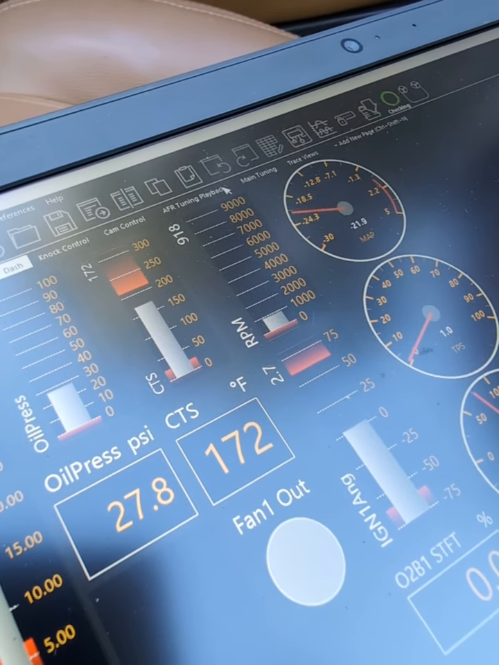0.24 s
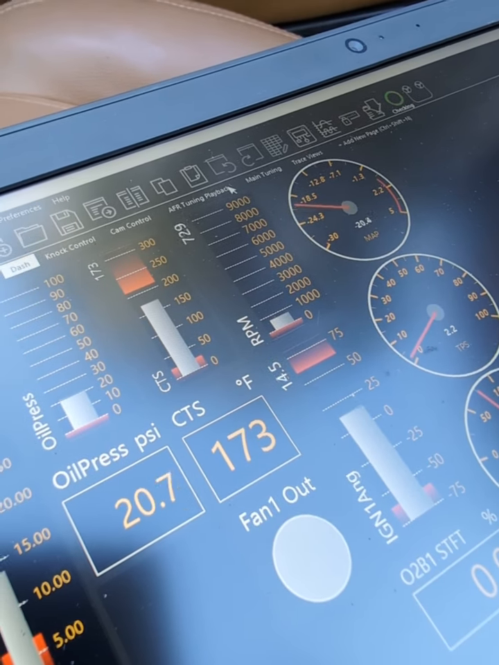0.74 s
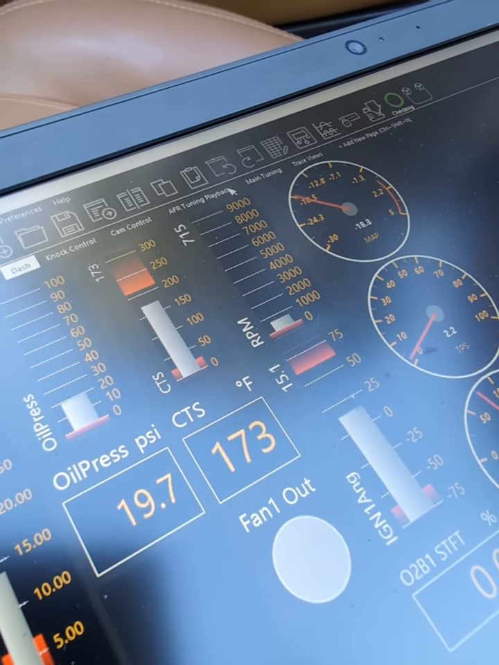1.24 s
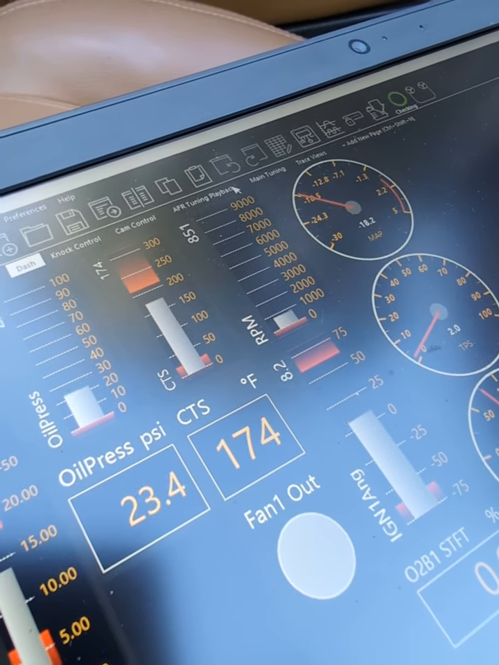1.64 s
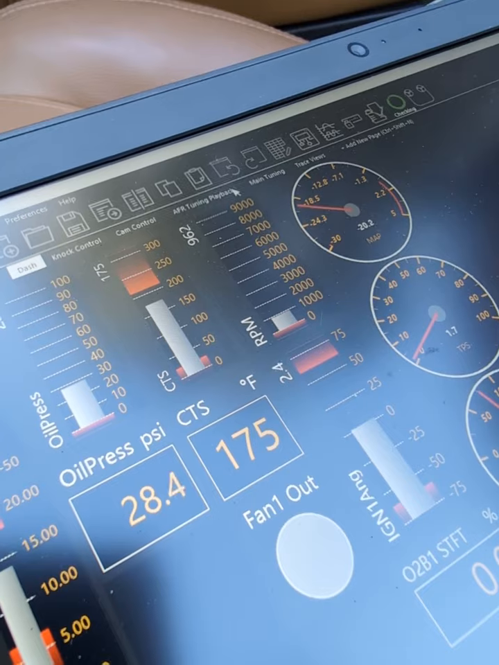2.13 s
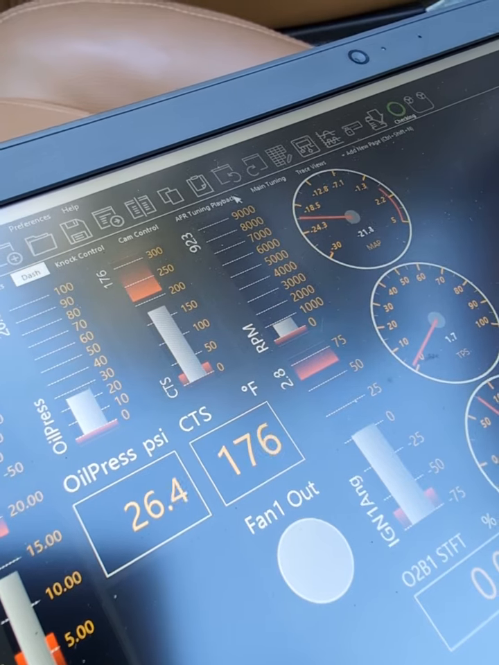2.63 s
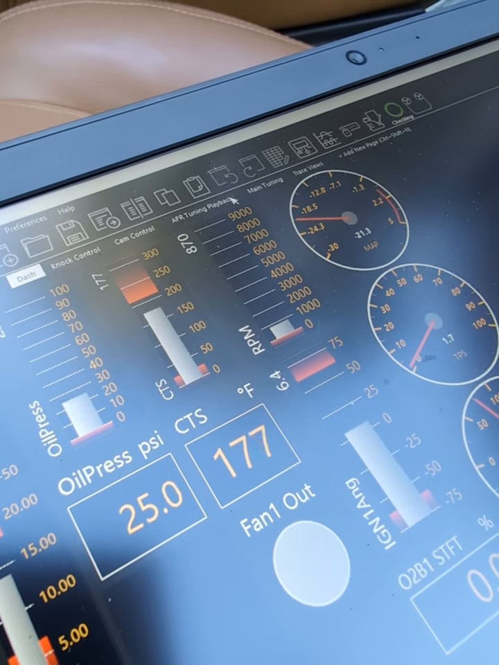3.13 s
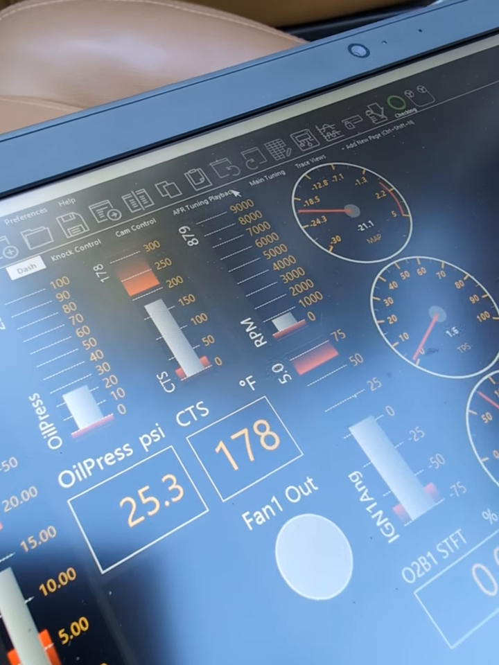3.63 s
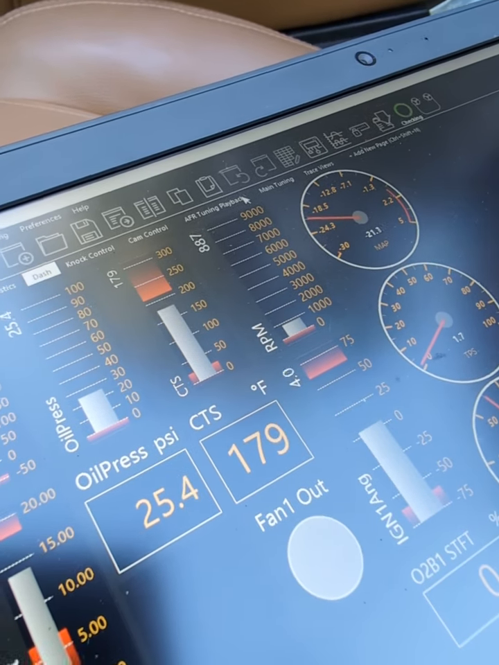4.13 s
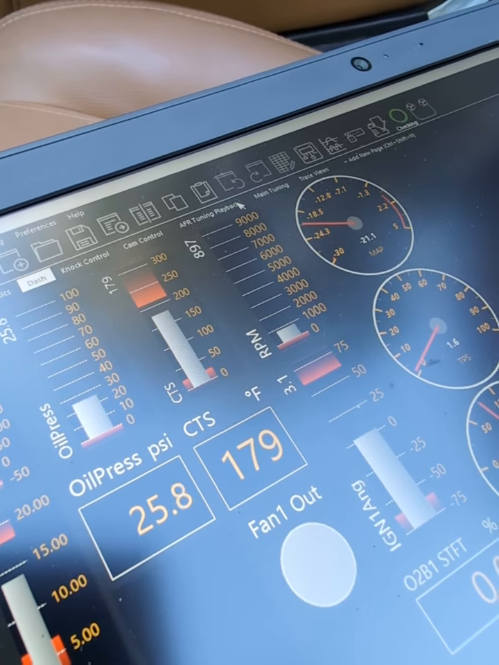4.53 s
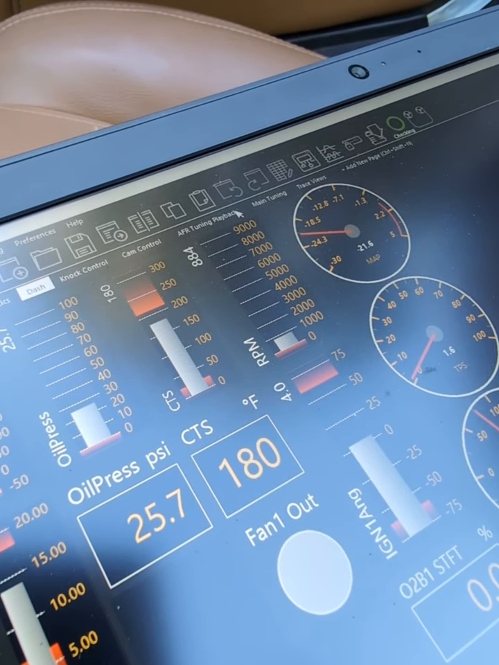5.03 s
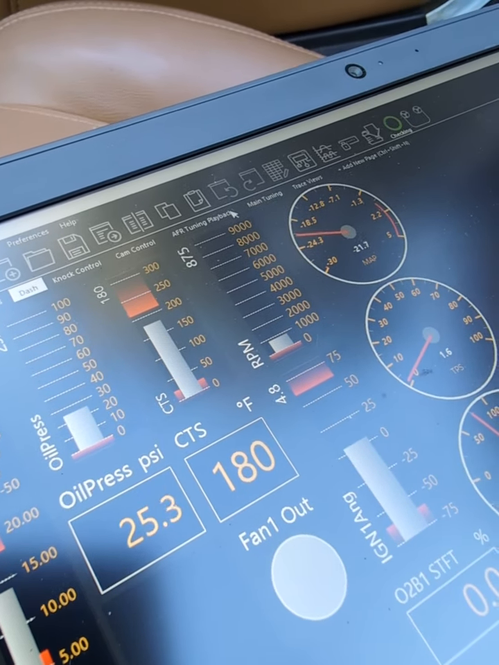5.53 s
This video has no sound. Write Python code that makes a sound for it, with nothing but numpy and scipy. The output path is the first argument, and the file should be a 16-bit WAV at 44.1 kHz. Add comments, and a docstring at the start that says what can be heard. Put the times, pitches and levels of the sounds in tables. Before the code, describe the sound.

Heard from inside a car, an idling engine slows and stumbles, its deep hum thinning to a rough throb. Within about two seconds it recovers with a swell, then eases down to an even, low drone that lasts to the end. Light mechanical ticking and a faint airy hiss pulse along with it, while very quiet high whines and tiny interior squeaks sit far behind.

```python
"""Inside a car, a four-cylinder engine idles: its speed sags, overshoots and settles.
The exhaust orders, harmonics of the two-turn engine cycle, excite a boom in the cabin, loudest at twice
the firing rate. The block rumbles through the bulkhead, valve gear clatters and intake air hisses once
per firing. Behind them lie thin whines, a narrow band fluttering near 6 kHz and faint trim squeaks."""
import sys
import numpy as np
from scipy import signal
from scipy.fft import rfft, irfft, next_fast_len
from scipy.io import wavfile
from scipy.ndimage import uniform_filter1d, map_coordinates

SR = 44100
rng = np.random.default_rng(int(sys.argv[2]) if len(sys.argv) > 2 else 0)


def materialize(psi):
    """Save the field psi as 16-bit PCM at rate SR to the path in sys.argv[1].

    A 1-D psi becomes a single channel; in a 2-D psi each row is a channel.
    """
    bounded = np.clip(np.atleast_2d(psi).T, -1, 1)
    quanta = np.round(bounded * 32767).astype(np.int16)
    wavfile.write(sys.argv[1], SR, quanta)


N = 255780

# Noise grows with speed. Each row: firings per second, then block, clatter and hiss gains in dB.
NOISE_BY_SPEED = [(23.6, -46, -58, -84), (26.3, -44.5, -56.5, -81), (29.13, -42, -55.5, -70.5),
                  (31.5, -41, -55, -69), (35.6, -39, -54, -68.5)]


def exhaust_boom(cycle, stumble):
    """Cabin resonance at twice the firing rate; sidebands from unequal cylinders beat with it."""
    # Each row: time in seconds, level of order 8 in dB.
    boom_levels = [(0.1, -10), (0.38, -15), (0.46, -24.5), (0.8, -26), (1.1, -32), (1.46, -16),
                   (1.69, -14.5), (1.78, -10.5), (2.13, -10.5), (2.42, -14), (2.78, -13.5), (2.97, -17),
                   (3.3, -18.5), (4.72, -16), (5.6, -19.5)]
    # Each row: order, level in dB relative to the boom.
    sidebands = [(6, -36), (7, -27.5), (9, -20), (10, -29)]
    # Each row: frequency in Hz, relative noise density in dB.
    bass_spectrum = [(15, -53.5), (30, -21), (42, -4), (60, -1), (75, -4.5), (100, -14.5), (150, -9.5),
                     (190, -26), (260, -60.5)]
    boom_db = over_time(boom_levels)[0]
    sound = tone(8 * cycle + .013 * wobble(27), boom_db + (.043 + .5 * stumble) * wobble(12), -.98)
    for order, db in sidebands:
        phase = .45 * (order - 8) + np.pi * (order % 2 == 0)  # early throb; even orders are inverted
        sound += tone(order * cycle + phase + .2 * wobble(3), boom_db + db + 1.5 * wobble(5), -1.2)
    return sound + amp(.2 * boom_db + 3.5 * stumble - 33.5) * noise(lambda hz: along(bass_spectrum, hz))


def exhaust_overtones(cycle, stumble):
    """Harmonics of the firing rate slide through cabin resonances and swell as the engine pulls up."""
    # Each row: firings per second, then levels in dB at 3, 4 and 5 times the firing rate.
    harmonic_levels = [(23.4, -33, -33, -46), (24.6, -34, -35.5, -53), (25.8, -31, -47, -56),
                       (27.8, -44, -48.5, -53), (29.1, -37.5, -40.5, -47), (30.1, -37.5, -38.5, -43.5),
                       (31.1, -43, -36.5, -41.5), (32.1, -33, -40, -38.5), (33.3, -44.5, -41, -39)]
    waver = .14 + 3 * stumble
    acceleration = np.gradient(firing_rate()) * SR
    sound = 0
    for order, db, pan_db in zip((12, 16, 20), by_speed(harmonic_levels), (0, 3, -1)):
        thump_lag = .87 * (order - 8) % (2 * np.pi)  # near the stall, orders gather into one thump
        lag = cabin_lag(order) + stumble ** 2 * (thump_lag - cabin_lag(order))
        angle = order * cycle - lag + .15 * waver * wobble(7.5)
        sound += tone(angle, db + .36 * acceleration + .6 * waver * wobble(11), pan_db, skew=.084)
    return sound


def engine_block(cycle, stumble):
    """Transmission through the bulkhead: the cabin's peaks and dips filter the orders and a rumble."""
    # Each row: order before rounding, relative level in dB, left minus right in dB.
    block_orders = [(10.98, 5.5, -1.5), (12.63, -12.5, 0.5), (14.99, -7.5, 6.5), (16.97, -6, 2.5),
                    (17.98, -9, -1.5), (19.03, -10, -2), (21, -10.5, 4), (23.8, -3, -1), (27.92, -4, 2.5),
                    (30.98, -14.5, -2.5), (31.78, -5, -1.5), (33, -14.5, -1.5), (35, -17, -2),
                    (36.07, -9.5, 1.5), (39.1, -15, -9.5), (39.87, -14.5, -16), (41.52, -6.5, -8.5),
                    (44, -9.5, -5), (47.93, -9.5, 4.5), (51.45, -12.5, -3.5), (56.25, -7.5, 0),
                    (63.46, -7.5, 4), (67.8, -8.5, -6.5), (71.38, -11, 0.5), (76.04, -13, -8.5),
                    (83.5, -8.5, -10.5)]
    # Each row: frequency in Hz, gain from block to cabin in dB.
    cabin_response = [(60, -23), (85, -10.5), (108, -11.5), (121, 3.5), (150, -0.5), (170, -11), (190, -15),
                      (230, -3), (265, -3), (290, -6.5), (315, -3), (365, -9.5), (412, -2), (450, -8.5),
                      (500, -12), (545, -0.5), (580, -7.5), (617, -3), (680, -19.5), (800, -18.5),
                      (1100, -63)]
    rumble_db = lambda hz: along(cabin_response, hz) + along([(100, -24), (200, -3), (700, -.5)], hz)
    rumble = amp(-6 + 4.5 * stumble + 1.2 * np.cos(4 * cycle)) * noise(rumble_db)
    step = 20  # low tones need only every 20th sample
    angle, rough, cycle_hz = cycle[::step], stumble[::step], firing_rate()[::step] / 4
    tones = 0
    for multiple, db, pan_db in block_orders:
        order = round(multiple)
        drift = order * .006 * wobble(2, step)
        jitter = order * .015 * rough * wobble(14, step)  # uneven burns blur the high orders most
        phase = order * angle - cabin_lag(max(order, 16)) + drift + jitter
        cabin_db = along(cabin_response, order * cycle_hz)
        level_db = db + cabin_db - .12 * order * rough + 1.2 * wobble(5, step)
        tones += tone(phase, level_db, pan_db, skew=rng.normal(0, order / 90))
    tones = signal.resample_poly(tones, step, 1, axis=1, padtype="line")[:, :N]
    return amp(by_speed(NOISE_BY_SPEED)[0]) * (rumble + tones)


def valve_clatter(cycle):
    """Forced vibration: valve gear noise rings the dash panels, swelling with each cycle and firing."""
    # Each row: frequency in Hz, relative noise density in dB.
    valve_spectrum = [(410, -26.5), (700, 2), (728, -4), (924, -2.5), (1170, -1.5), (1310, -2.5),
                      (1600, -4.5), (2040, -6.5), (2130, -7), (2470, -8), (3740, -16), (6530, -20.5),
                      (7500, -24), (9750, -57.5), (16500, -120)]
    # Each row: resonance in Hz, width in Hz, lift in dB.
    panel_modes = [(1045, 50, 9), (1257, 35, 5.6), (1690, 28, 2), (2013, 43, 7), (2210, 36, 6),
                   (2600, 18, 6), (3230, 270, 2), (5030, 160, 3)]
    lift_db = lambda hz: sum(db / (1 + (2 * (hz - mode) / width) ** 2) for mode, width, db in panel_modes)
    pulse = unit(amp(.62 * np.cos(cycle - .6) + .8 * np.cos(4 * cycle) + .54 * wobble(6.7)))
    ringing = noise(lambda hz: along(valve_spectrum, hz) + lift_db(hz))
    return amp(by_speed(NOISE_BY_SPEED)[1]) * pulse * ringing


def intake_hiss(cycle):
    """Flow noise: intake air pulses with each firing, and one cylinder draws harder."""
    # Each row: frequency in Hz, relative noise density in dB.
    air_spectrum = [(4500, -31.5), (7000, -1), (8500, -1.5), (10000, -3), (11300, 0), (13000, -2),
                    (14600, -6), (15500, -15)]
    pulse = unit(amp(.95 * np.cos(4 * cycle) + 1.5 * np.cos(cycle - 1.6) + .9 * wobble(13)))
    return amp(by_speed(NOISE_BY_SPEED)[2]) * pulse * noise(lambda hz: along(air_spectrum, hz))


def pulley_whine(cycle, stumble, order=273):
    """A rotational harmonic, perhaps of a belt-driven part: its pitch is proportional to engine speed."""
    return tone(order * cycle + 2.1 * wobble(10), -72 - 12 * stumble + 3 * wobble(2.8), -1.5, skew=.6)


def flutter(rate_hz=31, centre_hz=6350):
    """Amplitude modulation makes a narrow noise band flutter, whatever the engine speed."""
    pulse = unit(amp(2.6 * np.cos(2 * np.pi * rate_hz * np.arange(N) / SR + .8 * wobble(4))))
    band_db = lambda hz: -40 * np.log10(1 + ((hz - centre_hz) / 450) ** 4)
    return amp(-74) * pulse * noise(band_db)


def whines(stumble):
    """Random modulation makes thin tones, perhaps of pumps and fans, waver; they fade in a stumble."""
    # Each row: frequency in Hz, base level in dB.
    thin_tones = [(942, -70), (1345, -73), (1685, -73), (1855, -75), (2655, -77)]
    t = np.arange(N) / SR
    sound = 0
    for hz, db in thin_tones:
        angle = 2 * np.pi * hz * t + 2.5 * wobble(12)
        sound += tone(angle, db - 12 * stumble + 3 * wobble(3), rng.normal(0, 3), skew=rng.uniform(-2, 2))
    return sound


def trim_squeaks():
    """Each squeak of the trim is a falling glide, roughened by fast phase and amplitude modulation."""
    # Each row: start in seconds, length in seconds, first and last pitch in Hz, mid-squeak level in dB.
    glides = [(2.14, .12, 2680, 2560, -63), (3.31, .12, 3150, 2750, -65), (3.39, .13, 2420, 2380, -64),
              (3.4, .1, 2650, 2520, -67), (4.47, .12, 2850, 2550, -67), (5.36, .1, 2640, 2520, -65),
              (5.44, .11, 2450, 2370, -64)]
    sound = np.zeros((2, N))
    for start, length, first_hz, last_hz, db in glides:
        count = round(length * SR)
        pitch_hz = np.linspace(first_hz, last_hz, count)
        angle = 2 * np.pi * np.cumsum(pitch_hz) / SR + 1.8 * wobble(150)[:count]
        squeak = np.hanning(count) * tone(angle, db + 3 * wobble(51)[:count], 0, skew=.54)
        sound[:, round(start * SR):][:, :count] += squeak
    return sound


def firing_rate():
    """Firings per second; the flywheel's inertia rounds off every change of speed."""
    # Each row: time in seconds, firings per second before smoothing.
    idle_speed = [(0.0, 33.25), (0.25, 31.47), (0.42, 28.78), (0.62, 25.4), (0.85, 23.89), (1.1, 23.19),
                  (1.35, 24.73), (1.65, 28.88), (1.9, 31.07), (2.3, 32.48), (2.55, 31.95), (2.95, 29.55),
                  (3.2, 28.94), (3.7, 29.26), (4.15, 29.63), (4.55, 30.12), (5.2, 29.27), (5.8, 29.07)]
    return uniform_filter1d(over_time(idle_speed)[0], round(.2 * SR), mode="nearest")


def cabin_lag(order):
    """Dispersion: the cabin spreads each pulse by a lag in radians that grows away from order 16."""
    return (order - 16) ** 2 / 3


def noise(colour_db):
    """Interaural coherence: noise of mid rms 1, alike at both ears in the bass, unrelated higher up."""
    # Each row: frequency in Hz, correlation between the ears.
    coherence = [(60, 1.0), (130, 0.9), (290, 0.96), (640, -0.088), (1400, -0.25), (3080, 0.018),
                 (6770, -0.15), (14900, 0.26)]
    # Each row: frequency in Hz, left minus right in dB.
    balance = [(60, -3), (130, 0.5), (290, -3), (640, -4.5), (1400, -1.5), (3080, 0.0), (6770, 0),
               (14900, 2)]
    spread = lambda hz: np.arccos(np.clip(along(coherence, hz), -1, 1)) / 2
    mid_side_gain = lambda hz: amp(colour_db(hz)) * [np.cos(spread(hz)), np.sin(spread(hz))]
    mid, side = filtered(rng.standard_normal((2, N)), mid_side_gain)
    ear_gain = lambda hz: amp(np.outer([.5, -.5], along(balance, hz)))
    pair = filtered(np.array([mid + side, mid - side]), ear_gain)
    return pair / np.sqrt(np.mean(pair.mean(0) ** 2))


def tone(angle, db, pan_db, skew=0):
    """Interaural differences: a sine of rms level db, pan_db louder and skew radians ahead at left."""
    ear_gain = amp([[pan_db / 2], [-pan_db / 2]])
    return np.sqrt(2) * amp(db) * ear_gain * np.cos([angle + skew / 2, angle - skew / 2])


def wobble(rate, step=1):
    """A smooth random curve, rate knots a second, read every step samples."""
    coarse = np.arange(0, N + 64, 64)
    knots = rng.standard_normal(int(N * rate / SR) + 4)
    return np.interp(np.arange(0, N, step), coarse, map_coordinates(knots, [coarse * rate / SR]))


def filtered(x, response):
    """Linear filtering: the spectrum of x times a frequency response."""
    size = next_fast_len(N + 8192)
    return irfft(rfft(x, size) * response(np.fft.rfftfreq(size, 1 / SR)), size)[..., :N]


def by_speed(rows):
    """One value per sample for each column after the firing rate, smoothed over 30 ms."""
    rates, *columns = np.transpose(sorted(rows))
    levels = [np.interp(firing_rate(), rates, column) for column in columns]
    return uniform_filter1d(levels, round(.03 * SR), mode="nearest")


def over_time(rows):
    """One value per sample for each column after the time."""
    seconds, *columns = np.transpose(rows)
    return [np.interp(np.arange(N) / SR, seconds, column) for column in columns]


def along(points, hz):
    """Interpolation of (Hz, value) points on a logarithmic frequency axis."""
    frequencies, values = np.transpose(points)
    return np.interp(np.log(hz + 1), np.log(frequencies + 1), values)


def amp(db):
    """Amplitude ratio of a level in dB."""
    return 10 ** (np.asarray(db) / 20)


def unit(x):
    """x at rms 1."""
    return x / np.sqrt(np.mean(x ** 2))


def scene():
    """Superposition: the engine's layers share one crank angle, over faint independent sounds."""
    # Each row: time in seconds, how much one burn differs from the next, from 0 to 1.
    uneven_burns = [(0, 0), (.4, 0.63), (1.3, 1), (1.85, .4), (2.2, 0), (5.8, 0.13)]
    stumble = over_time(uneven_burns)[0]
    cycle = 2 * np.pi * (.86 + np.cumsum(firing_rate()) / 4 / SR)  # 2 pi spans two turns, four firings
    exhaust = exhaust_boom(cycle, stumble) + exhaust_overtones(cycle, stumble)
    engine = exhaust + engine_block(cycle, stumble) + valve_clatter(cycle) + intake_hiss(cycle)
    return engine + pulley_whine(cycle, stumble) + flutter() + whines(stumble) + trim_squeaks()


def record(dry, top_hz=15450):
    """Band limiting: the microphone keeps nothing above its top frequency."""
    return signal.sosfiltfilt(signal.ellip(10, .1, 60, top_hz, fs=SR, output="sos"), dry)


dry = scene()
out = record(dry)
materialize(out)
```